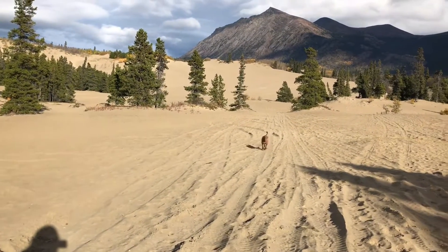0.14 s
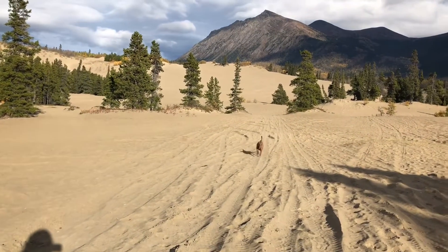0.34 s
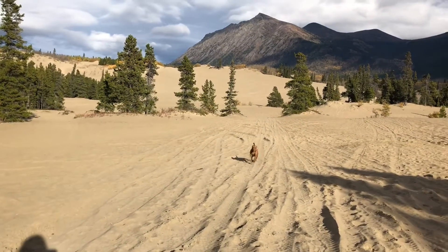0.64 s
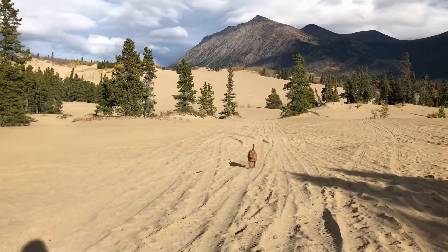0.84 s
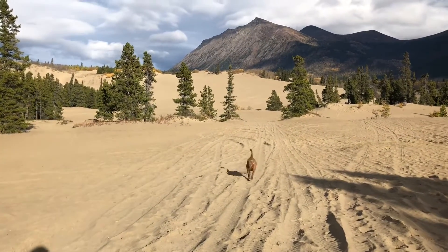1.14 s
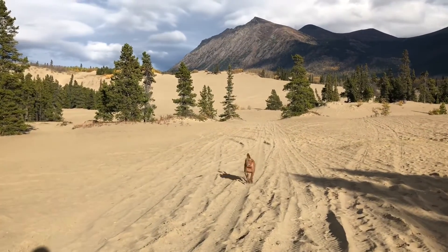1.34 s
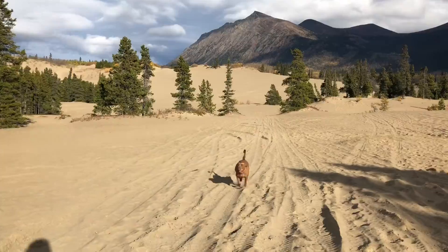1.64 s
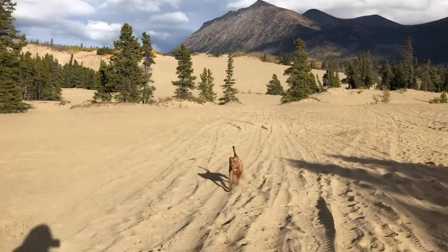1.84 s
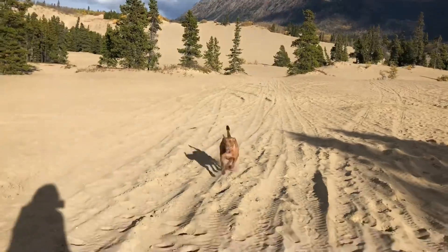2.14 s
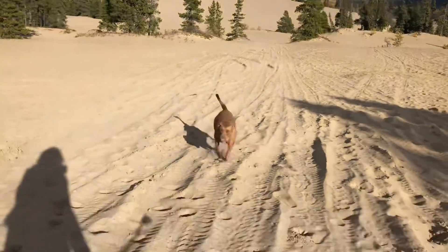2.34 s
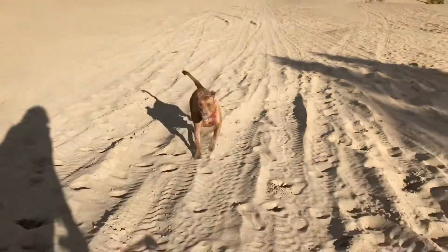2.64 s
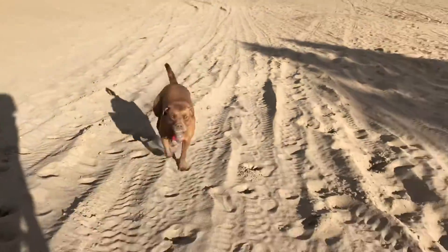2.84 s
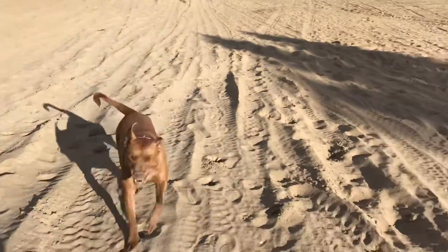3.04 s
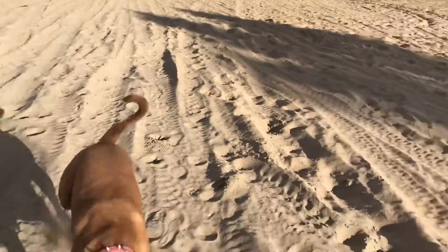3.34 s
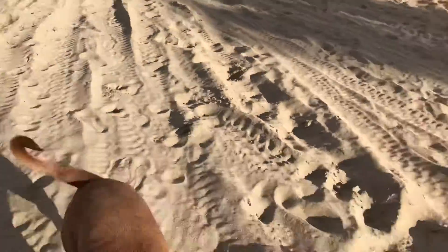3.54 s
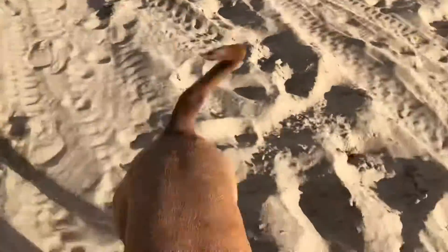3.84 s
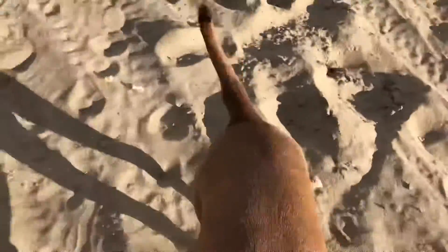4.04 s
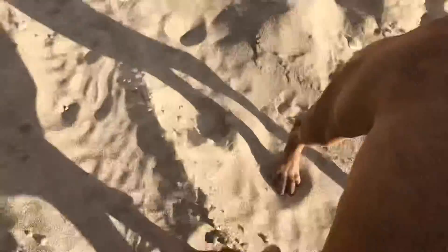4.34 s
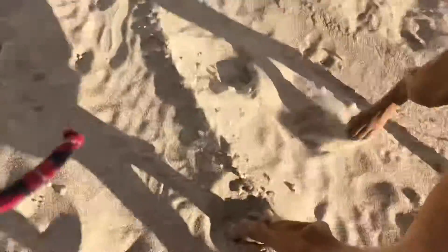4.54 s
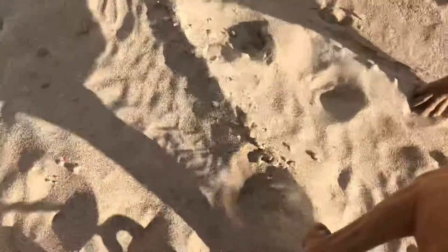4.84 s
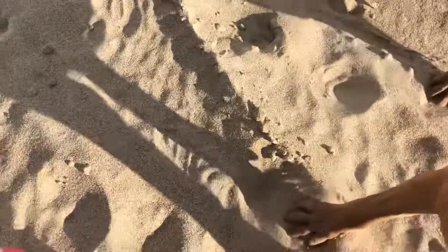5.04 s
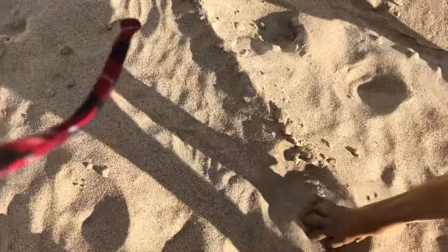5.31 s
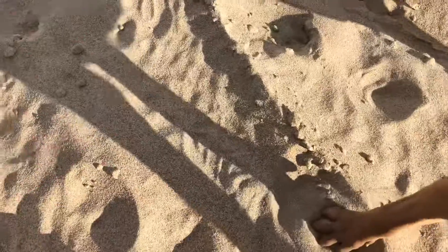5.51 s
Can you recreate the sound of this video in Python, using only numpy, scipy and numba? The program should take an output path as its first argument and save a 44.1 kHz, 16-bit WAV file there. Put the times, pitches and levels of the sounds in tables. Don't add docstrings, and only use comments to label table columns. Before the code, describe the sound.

An open, dry outdoor space with no noticeable echo and a very quiet hush of distant wind in trees, heard through a hand-held phone in one channel. From 0 s a dog pants far off: soft rough out-breaths roughly every 0.4 s with fainter hissing in-breaths between, growing steadily until 2.8 s. Low wind thuds and flutters cluster at 0.2-0.6 s and 1.3-1.7 s, with a few dry ticks around 1.4 and 1.75 s. From 2.9 s the breathing is close and irregular, with a sudden loud puff near 3.4 s and another full one at 4.3 s, raspy and hollow, edged with brief whistles and gliding hisses. Paws scuff gritty sand, most clearly at 3.3 and 4.2-4.3 s, among sharp clicks. From 4.7 s a strong gust slams the microphone with rumbling, crackling pops, strongest around 4.8 s and continuing to about 5.7 s, while close breaths poke through.

```python
import sys
import numpy as np
from scipy import signal
from scipy.fft import rfft, irfft
from scipy.io import wavfile
from scipy.ndimage import uniform_filter1d
from numba import njit

SR = 44100
rng = np.random.default_rng(int(sys.argv[2]) if len(sys.argv) > 2 else 0)


def elevation(decibels):
    levels = np.asarray(decibels, float)
    return 10 ** (levels / 20)


def dump_mix(stems):
    frames = np.atleast_2d(stems).T
    limited = np.clip(frames, -1, 1)
    pcm = np.round(limited * 32767).astype(np.int16)
    wavfile.write(sys.argv[1], SR, pcm)


N = 250047
TIME = np.arange(N) / SR

# start_s, end_s, level_db, upper_resonances_db
FAR_OUT_BREATHS = [
    (0, .14, -56.5, -14),
    (.385, .52, -56, -13.5),
    (.77, .9, -53, -18.5),
    (1.165, 1.295, -50, -18),
    (1.55, 1.665, -48.5, -18),
    (1.915, 2.055, -49.5, -16.5),
    (2.3, 2.44, -45.5, -19),
    (2.685, 2.84, -41, -19),
]
# start_s, end_s, level_db, lower_resonances_db
FAR_IN_BREATHS = [
    (.19, .33, -69.5, -7),
    (.57, .72, -69, 6),
    (.95, 1.14, -71.5, 5),
    (1.39, 1.5, -66.5, 2),
    (1.69, 1.86, -60, 2.5),
    (2.09, 2.24, -56, 0.7),
    (2.47, 2.65, -54.5, 3),
    (3.63, 3.73, -57.5, 3.5),
]
# pitch_hz, width_hz, level_db
THROAT_OUT = [(560, 90, -5), (900, 192, 2.5), (1403, 250, 1.5), (2500, 350, -6.5), (3610, 500, -14),
              (4600, 430, -17.5), (6670, 5100, -28)]
# pitch_hz, width_hz, level_db
THROAT_IN = [(1050, 440, 0.5), (1920, 230, -9.5), (2500, 1600, -13), (3640, 230, -7), (4600, 300, 1),
             (5700, 590, -12), (7200, 2600, -22.5)]
# start_s, loudest_s, end_s, level_db, mouth_hz
HOLLOW_BREATHS = [(3.41, 3.422, 3.515, -33.5, 1450), (3.784, 3.875, 3.95, -42, 1580),
                  (3.944, 3.975, 4.16, -49.5, 1380), (4.435, 4.477, 4.53, -50.5, 1290),
                  (4.823, 4.873, 5.8, -48, 1220), (4.912, 4.924, 5.096, -29.5, 1370),
                  (5.09, 5.27, 5.36, -47.5, 1250), (5.416, 5.472, 5.66, -34, 1400)]
# start_s, loudest_s, end_s, level_db, mouth_hz
OPEN_BREATHS = [
    (2.864, 2.958, 3.065, -42, 1200),
    (3.375, 3.375, 3.44, -25, 1140),
    (4.246, 4.306, 4.432, -28, 1460),
    (5.638, 5.663, 5.8, -36, 1180),
]
# start_s, loudest_s, end_s, level_db, mouth_hz
RASPY_BREATHS = [(3.01, 3.148, 3.2, -45, 1410), (3.288, 3.358, 3.36, -39.5, 1360),
                 (3.527, 3.552, 3.76, -50.5, 1010), (3.608, 3.606, 3.72, -43, 1370),
                 (3.752, 3.748, 3.8, -62, 1340), (4.12, 4.156, 4.27, -38, 1850),
                 (4.17, 4.193, 4.245, -38, 1700), (4.514, 4.55, 4.62, -47, 1521),
                 (4.575, 4.593, 4.71, -47, 2050)]
# throat_db, rasp_db, drop_at_start_db, drop_at_end_db
MANNERS = [(6.5, -16, 9.5, 19.5), (-8.5, -6, 17.5, 19.5), (-4, 2.5, 12, 21.5)]
# pitch_hz, width_hz, level_db
RASP_RESONANCES = [(2830, 710, 5.5), (3750, 1400, 6), (4430, 740, -3)]
# time_s, throat_hz
HEAD_MOVES = [(2.86, 770), (3.15, 914), (3.36, 820), (3.375, 510), (3.54, 452), (3.63, 863), (4.2, 872),
              (4.55, 760), (4.7, 540)]
# start_s, hold_s, level_db, fall_db_per_s
PUFFS = [(0, 0.026, -50, 348), (.225, 0.032, -39.5, 200), (.28, 0.043, -35, 500), (.365, 0.013, -35.5, 299),
         (.41, 0.042, -36, 300), (.455, 0.037, -32, 301), (.51, 0.045, -36, 199), (.69, .14, -48.5, 599),
         (.99, 0.061, -53, 229), (1.285, 0.047, -29.5, 298), (1.435, 0.035, -32, 200),
         (1.51, 0.032, -30, 200), (1.62, 0.032, -29, 198), (1.8, 0.087, -43.5, 100),
         (1.955, 0.031, -35.5, 350), (2.105, 0.087, -38.5, 597), (2.28, 0.09, -49, 103),
         (2.485, 0.018, -36.5, 698), (2.64, 0.087, -47.5, 46), (3.04, 0.021, -43, 200),
         (3.21, 0.027, -40, 369), (3.4, .08, -50, 100), (3.51, 0.16, -44.5, 173), (3.83, 0.03, -45, 189),
         (3.96, 0.24, -52, 100), (4.22, 0.02, -37.5, 85), (4.47, .04, -45.5, 452), (4.585, 0.13, -39, 197)]
# time_s, level_db, crackle_db
GUST = [(4.66, -43, -10), (4.7, -23, 3), (4.745, -21, 1.5), (4.834, -13.5, 0.5), (4.87, -23, -3),
        (4.91, -19.5, 0), (5.04, -21.5, -2), (5.11, -20, -0.5), (5.175, -21.5, -1), (5.22, -26, -9),
        (5.312, -26.5, -9), (5.331, -23, -11), (5.42, -13.5, -9), (5.445, -24.5, 0.5), (5.485, -20, -2),
        (5.53, -20.5, -3), (5.61, -20.5, -6.5), (5.67, -25, 0.5)]
# start_s, peak_db, pitch_hz
POPS = [(0.138, -34, 286), (0.224, -34, 131), (0.279, -30.5, 145), (0.307, -22.5, 268), (0.32, -28, 100),
        (0.424, -33, 170), (0.462, -28.5, 129), (0.553, -25.5, 86), (0.586, -30.5, 70), (0.367, -28.5, 136),
        (0.402, -35, 154), (0.454, -23, 161), (0.514, -29.5, 216), (0.54, -26, 156), (0.688, -39.5, 120),
        (1.286, -18, 145), (1.315, -18.5, 185), (1.356, -29, 390), (1.39, -35, 160), (1.436, -24, 185),
        (1.497, -25, 170), (1.466, -22, 300), (1.514, -20.5, 340), (1.583, -29, 191), (1.627, -20, 202),
        (1.711, -38, 150), (1.751, -30.5, 354), (1.809, -43, 164), (1.914, -33.5, 119), (1.961, -34, 186),
        (2.107, -30.5, 256), (2.179, -28.5, 134), (2.268, -37.5, 131), (2.485, -33.5, 123),
        (2.15, -41, 178), (2.195, -37, 202), (2.371, -43.5, 280), (2.803, -36.5, 292), (3.005, -38, 485),
        (3.052, -38, 204)]
# start_s, peak_db, pitch_hz
SNAPS = [(4.688, -24, 250), (4.702, -12, 269.4), (4.7025, -15, 750), (5.156, -15, 850), (5.074, -12, 600),
         (5.095, -12, 620), (4.7545, -14, 700), (5.4095, -13, 650), (4.736, -23, 325), (4.755, -4, 267),
         (4.776, -4, 780), (4.799, -1.5, 470), (4.811, -7, 300), (4.82, -9.5, 234), (4.831, -6.5, 172),
         (4.8495, -8, 560), (4.91, -11.5, 219), (4.94, -12, 226), (5.113, -14.5, 236), (5.188, -13.5, 257),
         (5.223, -15, 227), (5.255, -20, 330), (5.291, -13.5, 255), (5.452, -13.5, 325),
         (5.489, -10.5, 375), (5.422, -9.5, 300), (4.887, -12.5, 590), (4.903, -6.5, 249),
         (4.9745, -9.5, 587), (5, -10.5, 495), (5.046, -19, 342), (5.07, -6.5, 488), (5.092, -7, 430),
         (5.144, -12, 600), (5.156, -7, 347), (5.181, -16, 550), (5.212, -25, 308), (5.323, -17, 490),
         (5.331, -13.5, 470), (5.37, -16, 169), (5.385, -13.5, 158), (5.365, -14.5, 420), (5.394, -14, 271),
         (5.41, -15, 507), (5.427, -8.5, 517), (5.4752, -6.5, 580), (5.574, -9.5, 570), (5.597, -3, 560)]
# start_s, peak_db, pitch_hz
WOBBLES = [(0, -35, 70.05), (.03, -42, 60), (1.83, -35, 65), (2.95, -42, 109), (3.211, -33.5, 75.5),
           (3.232, -45, 75), (3.59, -44, 100), (3.648, -39, 92), (4.236, -29.5, 122), (4.467, -31, 66.6),
           (4.494, -31.5, 70), (4.599, -31, 84), (4.63, -25.5, 90)]
# pitch_hz, level_db (per Hz)
HUSH_TONE = [(24, -33), (40, 6.5), (174, -13), (600, -13), (900, -11.5), (1450, -12.5), (1850, -21),
             (15500, -44.5)]
# start_s, peak_db, pitch_hz, treble_db
TICKS = [(0.1358, -43.5, 2820, -9), (0.657, -45, 2010, -8), (0.7144, -59, 1800, 3),
         (1.3535, -25, 2190, -23), (1.376, -39, 3580, -14), (1.387, -44, 1950, -8),
         (1.4217, -43, 2470, -27), (1.512, -48, 1890, -8), (1.558, -42, 2090, -7),
         (1.748, -28.5, 2000, -15), (1.923, -44, 2210, -12), (3.3712, -17.5, 3480, -17),
         (3.3842, -17, 1500, -7), (3.3265, -29.5, 3020, 12.5), (3.343, -32, 3000, 5),
         (3.0757, -50, 3000, 8), (3.5791, -50, 3020, 10), (4.1387, -28, 2500, -13), (4.1577, -42, 3000, 8),
         (4.197, -21.5, 2950, -6), (3.619, -23, 3060, -37), (3.7584, -33, 920, -14), (4.106, -40, 2350, -6),
         (4.284, -16, 1800, -12.5), (4.754, -44, 2010, 3), (4.809, -30.5, 1840, -20),
         (5.357, -56, 1850, -2), (5.61, -21, 5650, -0.5), (5.6524, -38.5, 1970, 8)]
# start_s, end_s, pitch_hz, width_hz, level_db
WHISTLES = [(3.085, 3.172, 1560, 180, -40), (3.88, 3.944, 507, 70, -45.5), (3.125, 3.169, 3860, 1000, -43),
            (3.408, 3.501, 2830, 201, -45), (3.79, 3.915, 2800, 170, -47), (3.797, 3.93, 1660, 147.1, -41),
            (3.81, 3.927, 900, 89.5, -41.5), (3.4, 3.485, 1830, 493, -40), (3.415, 3.505, 510, 80, -35),
            (3.617, 3.646, 3520, 900, -39), (4.27, 4.341, 1980, 200, -31), (3.323, 3.376, 2000, 250, -38.5),
            (4.182, 4.245, 8930, 1470, -45), (4.257, 4.335, 1330, 251.6, -34),
            (4.335, 4.385, 1500, 500, -39), (3.95, 4.06, 950, 150, -52), (4.45, 4.5, 1350, 150, -53),
            (2.12, 2.21, 4800, 300, -60), (2.5, 2.59, 4750, 300, -57), (5.65, 5.669, 1350, 200, -30),
            (5.11, 5.16, 2050, 300, -46), (4.291, 4.391, 4310, 300, -38.5), (4.296, 4.365, 5740, 500, -39),
            (4.83, 4.908, 3200, 900, -45), (4.904, 5.06, 3320, 400, -44.5),
            (5.093, 5.19, 4800, 1320, -51.5), (5.187, 5.29, 4400, 600, -55.5)]
# start_s, end_s, from_hz, to_hz, level_db
GLIDES = [(2.882, 2.97, 4300, 4780, -59), (2.867, 2.968, 1250, 1360, -54), (2.933, 2.96, 2200, 1900, -48),
          (3.3, 3.05, 2500, 2350, -52), (2.99, 3.04, 810, 450, -52), (2.985, 3.028, 7400, 6200, -56),
          (3.025, 3.135, 3370, 3950, -52.5), (3.043, 3.095, 1300, 1460, -48.5),
          (3.125, 3.162, 6000, 6100, -50), (3.09, 3.17, 7800, 7700, -59), (3.185, 3.175, 7100, 14000, -58),
          (3.29, 3.33, 1400, 1220, -45), (3.317, 3.355, 7950, 7200, -33), (3.32, 3.345, 5000, 4800, -46),
          (3.35, 3.378, 2340, 3500, -35), (3.375, 3.41, 4950, 4540, -36.5), (3.63, 3.72, 4300, 4600, -62),
          (3.95, 4.01, 4000, 4600, -60), (4.16, 4.24, 6300, 7000, -53), (4.167, 4.245, 7700, 8250, -47),
          (4.28, 4.297, 3950, 3240, -40.5), (4.3, 4.35, 9500, 8800, -50), (4.575, 4.628, 2230, 1880, -48),
          (3.532, 3.607, 2300, 2600, -57), (3.542, 3.608, 4300, 4600, -58),
          (3.612, 3.655, 5600, 5800, -49.5), (4.582, 4.6, 5250, 5230, -51.5),
          (4.968, 5.047, 1240, 990, -31), (5.2, 5.29, 1900, 2000, -54.5), (5.437, 5.497, 1530, 1980, -42),
          (0.64, .69, 5300, 5800, -70), (0.28, .31, 7500, 7200, -75)]
# start_s, hold_s, level_db, fall_db_per_s
SCUFFS = [(2.2, 0.73, -76.5, 100), (2.72, 0.069, -68, 300), (2.88, .04, -70, 100), (2.925, .02, -64, 100),
          (2.945, 0.02, -55, 900), (2.99, 0.032, -60.5, 150), (3.08, 0.036, -59, 100),
          (3.135, 0.021, -61, 902), (3.19, 0.03, -66, 200), (3.26, .004, -64, 500),
          (3.319, 0.034, -37.5, 400), (3.36, 0.035, -46, 152), (3.545, 0.048, -60.5, 300),
          (3.62, 0.0062, -55, 252), (3.66, .13, -70.5, 100), (3.8, 0.044, -60.5, 73),
          (3.85, 0.036, -56, 86), (4.08, .05, -66, 100), (4.135, .03, -54.5, 500),
          (4.16, 0.072, -48.5, 500), (4.262, 0.022, -53, 100), (4.282, .02, -50.5, 103),
          (4.305, .04, -44, 300), (4.4, 0.12, -65.5, 100), (4.535, 0.084, -59, 150),
          (4.78, 0.057, -62, 102), (4.845, 0.17, -51, 248), (5.11, 0.13, -67, 200),
          (5.354, 0.0037, -58.5, 350), (5.43, .18, -56.5, 2000), (5.64, .04, -55.5, 100)]
# pitch_hz, level_db
GRAINS = [(4600, -1.5), (6500, -0.5), (8000, -6), (10000, -10.0), (12000, -10.5), (15000, -7.0)]


def unit(x):
    return x / np.sqrt(np.mean(x ** 2))


@njit
def svf(x, hz, width, low):
    y, b, l = np.empty(len(x)), 0., 0.
    for i in range(len(x)):
        g, k = np.tan(np.pi * hz[i] / SR), width[i] / hz[i]
        v = (b + g * (x[i] - l)) / (1 + g * (g + k))
        lo = l + g * v
        b, l = 2 * v - b, 2 * lo - l
        y[i] = lo if low else k * v
    return y


def band(x, hz, width, low=False):
    return svf(x, np.clip(hz + 0 * TIME, 20, 18000), width + 0 * TIME, low)


def walk(rate):
    hold = int(SR / rate)
    levels = np.repeat(rng.standard_normal(N // hold + 1), hold)
    smooth = uniform_filter1d(uniform_filter1d(levels, hold), hold)
    return unit(smooth[:N])


def add(out, s, wave):
    i = int(s * SR)
    out[i:i + len(wave)] += wave[:N - i]


def swells(rows, rise_db_s):
    level = np.full(N, -120.)
    for s, hold, db, fall_db_s in rows:
        rise = rise_db_s * (s - TIME).clip(0)
        fall = fall_db_s * (TIME - s - hold).clip(0)
        level = np.maximum(level, db - rise - fall)
    return elevation(level)


def turbulence(flutter_hz, flutter, rasp_db):
    phase = np.cumsum(flutter_hz * (1 + 0.23 * walk(40))) / SR % 1
    flaps = 1 + flutter * np.exp(-phase / 0.16)
    return rng.standard_normal(N) * flaps * elevation(rasp_db * walk(90))


def ring(air, modes):
    waver = 1 + 0.023 * walk(17)
    out = 0
    for k, (hz, width, db) in enumerate(modes):
        mode = band(band(air, hz * waver, 1.4 * width), hz * waver, 1.4 * width)
        out = out + (-1) ** k * elevation(db) * mode
    return unit(out)


def far_breaths(rows, main, part, swell_db, arch):
    gain, share, middle = np.zeros(N), np.zeros(N), np.zeros(N)
    for start, end, db, part_db in rows:
        now = (TIME >= start) & (TIME < end)
        along = (TIME[now] - start) / (end - start)
        gain[now] = elevation(db + swell_db * along)
        middle[now] = np.sin(np.pi * along) ** arch
        share[TIME >= start - .03] = elevation(part_db)
    edge = int(.02 * SR)
    gain = uniform_filter1d(uniform_filter1d(gain, edge), edge)
    return gain * (uniform_filter1d(middle, edge) * main + share * part)


def close_breaths(fade):
    bend = 1.3
    gain = np.zeros(N)
    shape = np.zeros((3, N)) + [[OPEN_BREATHS[0][4]], [0], [0]]
    for rows, manner in zip((HOLLOW_BREATHS, OPEN_BREATHS, RASPY_BREATHS), MANNERS):
        throat_db, rasp_db, start_db, end_db = manner
        for start, top, end, db, hz in rows:
            now = (TIME >= start) & (TIME < end)
            before = (top - TIME[now]).clip(0) / max(top - start, 1e-3)
            after = (TIME[now] - top).clip(0) / max(end - top, 1e-3)
            level_db = db - start_db * before ** bend - end_db * after ** bend
            gain[now] = np.maximum(gain[now], elevation(level_db))
            around = (TIME >= start - fade) & (TIME < end + fade)
            shape[:, around] = [[hz], [throat_db], [rasp_db]]
    edge = int(fade * SR)
    return (uniform_filter1d(gain, edge), *uniform_filter1d(shape, edge))


def dog():
    air = turbulence(flutter_hz=63.1, flutter=1.0, rasp_db=0.0)
    low, high = ring(air, THROAT_OUT[:4]), ring(air, THROAT_OUT[4:])
    out = far_breaths(FAR_OUT_BREATHS, low, high, swell_db=0.5, arch=0.45)

    air = turbulence(flutter_hz=90.0, flutter=0.66, rasp_db=-1.0)
    high, low = ring(air, THROAT_IN[3:]), ring(air, THROAT_IN[:3])
    out += far_breaths(FAR_IN_BREATHS, high, low, swell_db=-3.0, arch=1.5)

    gain, mouth_hz, throat_db, rasp_db = close_breaths(fade=0.0039)
    throat_hz = np.interp(TIME, *np.transpose(HEAD_MOVES))
    air = turbulence(flutter_hz=107.2, flutter=0.81, rasp_db=2.0)
    mouth = ring(air, [(mouth_hz, 260, 0), (1600, 1200, -10)])
    throat = ring(air, [(throat_hz, 80, 0), (750, 600, -13)])
    rasp = 0
    for mode in RASP_RESONANCES:
        rough = turbulence(flutter_hz=112.4, flutter=1.0, rasp_db=5.5)
        rasp = rasp + elevation(mode[2]) * ring(rough, [mode])
    rasp = elevation(rasp_db - 7.5) * unit(rasp)
    chest = elevation(np.interp(TIME, (3.3, 3.6), (-17, -6))) * ring(air, [(300, 260, 0)])
    return out + gain * (mouth + elevation(throat_db - 3.0) * throat + rasp + chest)


def eddies(rate, fall_s):
    kicks = (rng.random(N) < rate / SR) * rng.exponential(size=N)
    kicks = signal.lfilter([1], [1, -np.exp(-1 / (fall_s * SR))], kicks)
    smooth = uniform_filter1d(kicks / kicks.mean(), int(.003 * SR))
    return 2.5 * np.tanh(smooth / 2.5)


def wind():
    breeze = swells(PUFFS, rise_db_s=649)
    s, gust_db, crackle_db = np.transpose(GUST)
    gust = elevation(np.interp(TIME, s, gust_db, left=-120))
    crackle_db = np.interp(TIME, s, crackle_db)

    kick = eddies(rate=70, fall_s=0.013)
    edge_hz = 290 * (breeze + gust + 1e-4) ** 0.15 * (.55 + 0.65 * kick)
    roll = band(rng.standard_normal(N) * (2.7 + kick), 75, 350)
    roll = band(roll, edge_hz, 1.5 * edge_hz, True)
    roll = band(roll, 1.2 * edge_hz, 1.5 * edge_hz, True)

    kick = eddies(rate=110, fall_s=0.0051)
    small_hz = 520 * (1.0 + 0.08 * kick)
    small = band(rng.standard_normal(N) * (2.4 + kick), small_hz, 1.23 * small_hz)
    small = band(small, 0.87 * small_hz, 1.56 * small_hz, True)
    out = elevation(-2.5) * (breeze + gust) * unit(roll) + gust * elevation(crackle_db - 6.0) * unit(small)

    strikes = POPS + SNAPS + WOBBLES
    for (s, db, hz), turn in zip(strikes, rng.random((len(strikes), 1))):
        cycles = TIME[:3000] * hz
        shape = (cycles / 0.66 * np.exp(1 - cycles / 0.64)) ** 1.43
        swing = np.sin(2 * np.pi * (2.767 * np.log(1 + cycles / 1.86) + turn))
        add(out, s, elevation(db) * shape * swing)
    return band(out, 1680, 2250, True)


def far_trees():
    hz, db = np.transpose(HUSH_TONE)
    f = np.fft.rfftfreq(N, 1 / SR) + 1
    tone = elevation(np.interp(np.log(f), np.log(hz), db))
    hush = irfft(rfft(rng.standard_normal(N)) * tone, N)
    return elevation(-56 + 0.5 * walk(3.4)) * unit(hush)


def ticks():
    dull, bright = np.zeros(N), np.zeros(N)
    t = TIME[:2000]
    cracks = rng.standard_normal((len(TICKS), len(t)))
    for (s, db, hz, treble_db), crack in zip(TICKS, cracks):
        knock = 1.8 * crack + 0.74 * np.sin(2 * np.pi * hz * t)
        add(dull, s, elevation(db - 4.5 - 60 * t / 0.025) * knock)
        add(bright, s, elevation(db + treble_db - 60 * t / 0.017) * crack)
    dull = band(band(dull, 3300, 3600, True), 1800, 7300)
    bright = band(band(bright, 7100, 7000), 8400, 12000)
    return dull + bright


def narrow_breath(piece, hz, width, db, taper):
    thin = unit(svf(svf(piece, hz, width, False), hz, width, False))
    return elevation(db) * signal.windows.tukey(len(piece), taper) * thin


def whistles():
    out, air = np.zeros(N), turbulence(flutter_hz=100, flutter=0.76, rasp_db=1.5)
    for start, end, hz, width, db in WHISTLES:
        piece = air[int(start * SR):int(end * SR)]
        glide = hz * (1 - 0.68 * TIME[:len(piece)])
        width = np.full(len(piece), 1.3 * width)
        add(out, start, narrow_breath(piece, glide, width, db, .45))
    for start, end, from_hz, to_hz, db in GLIDES:
        piece = air[int(start * SR):int(end * SR)]
        glide = np.geomspace(from_hz, to_hz, len(piece))
        add(out, start, narrow_breath(piece, glide, 0.22 * glide, db, .6))
    return out


def sand():
    gain = swells(SCUFFS, rise_db_s=1501)
    out = 0
    for hz, db in GRAINS:
        size = elevation(4.6 * np.minimum(rng.exponential(size=N), 5))
        grains = rng.standard_normal(N) * size
        hz = hz * (1 + 0.073 * walk(25.13))
        patch = unit(band(band(grains, hz, 0.42 * hz), hz, 0.55 * hz))
        out = out + elevation(db + 2.4 * walk(35)) * patch
    return gain * elevation(2.04 * walk(110)) * out


def scene():
    return (dog() + wind() + far_trees() + ticks() + whistles() + sand())[None]


def band_limit(x):
    return signal.sosfilt(signal.butter(12, 15830, fs=SR, output="sos"), x)


def record(dry):
    cut = signal.sosfilt(signal.butter(4, 50, "high", fs=SR, output="sos"), dry)
    cut = signal.sosfilt(signal.ellip(10, .3, 80, 15830, fs=SR, output="sos"), cut)
    mix = np.tanh(1.138 * cut) / 1.126
    return band_limit(mix)


dry = scene()
out = record(dry)
dump_mix(out)
```